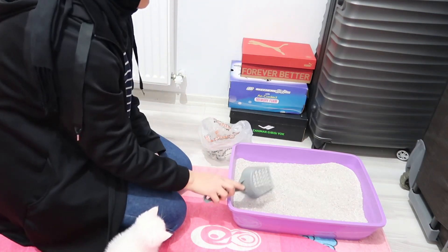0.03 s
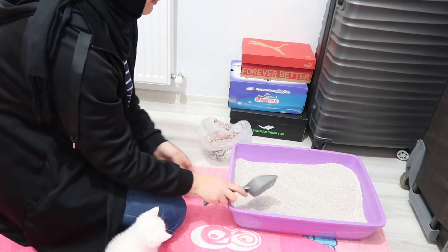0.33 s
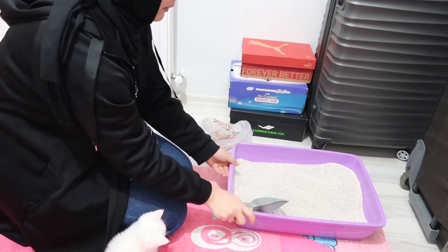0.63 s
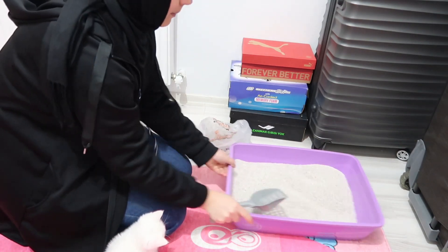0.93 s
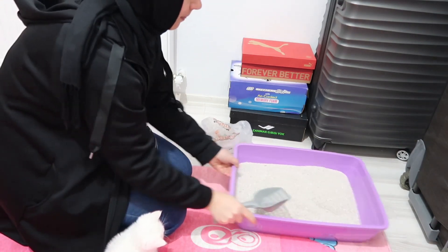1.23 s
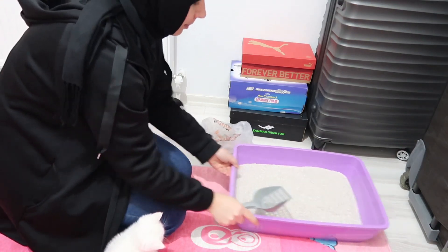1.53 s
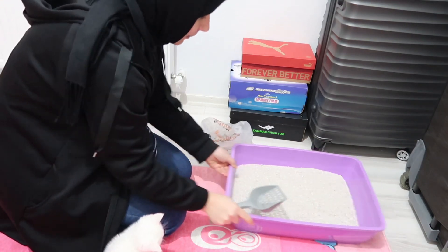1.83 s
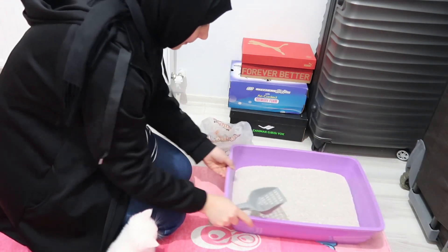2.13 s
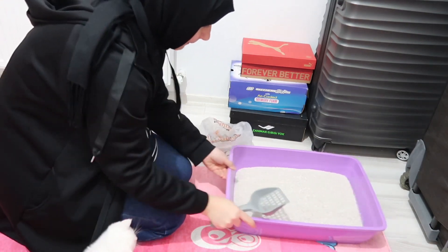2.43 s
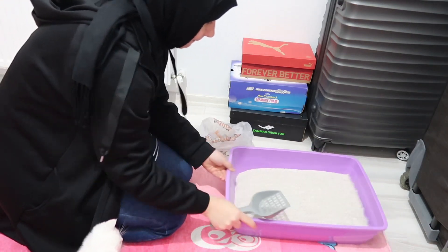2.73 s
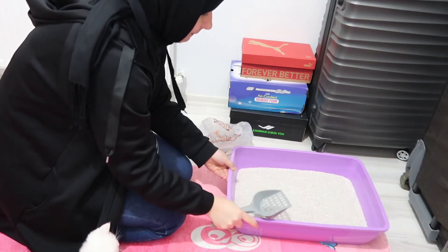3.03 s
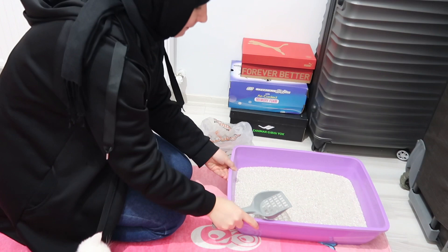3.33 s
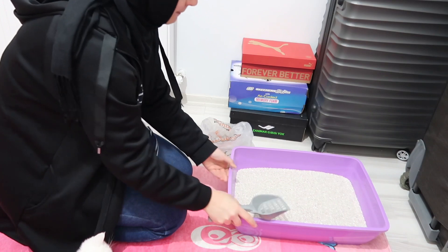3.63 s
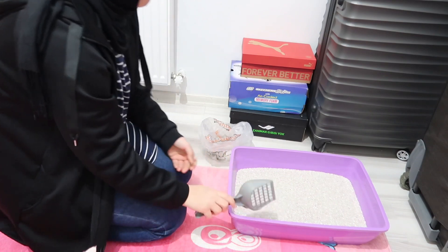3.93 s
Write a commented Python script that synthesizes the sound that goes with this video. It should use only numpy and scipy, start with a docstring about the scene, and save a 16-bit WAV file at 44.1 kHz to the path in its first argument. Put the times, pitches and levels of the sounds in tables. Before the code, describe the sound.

Cat litter hisses and crunches under a shaken scoop between knocks against a plastic tray.

```python
"""Three knocks set a plastic tray of cat litter booming, close to the microphone in a small room.
The scoop clacks down, then is pushed to and fro about six times a second, the granules hissing
and crunching in step with its speed while the tray rocks with soft thuds. After a pause and a
short rustle the scoop knocks against the tray wall. Each blow rings tray, scoop and wall, and
the harder ones jolt granules loose."""
import sys
import numpy as np
from scipy import signal
from scipy.fft import rfft, irfft
from scipy.io import wavfile
from scipy.ndimage import uniform_filter1d, minimum_filter1d

SR = 44100
rng = np.random.default_rng(int(sys.argv[2]) if len(sys.argv) > 2 else 0)


def wav_record(signal):
    """Record a signal, one row per channel, as 16-bit PCM in the file named by sys.argv[1]."""
    frames = np.transpose(np.atleast_2d(signal))
    bounded = np.clip(frames, -1, 1)
    # unit amplitude maps onto the largest positive 16-bit level
    quanta = np.round(bounded * 32767).astype(np.int16)
    wavfile.write(sys.argv[1], SR, quanta)


N = 176400
RING_T = np.arange(int(.6 * SR)) / SR  # time axis of one blow, s

# Spectrum of single granules hitting bare plastic: f/Hz, level/dB
GRIT_SPECTRUM = [(2500, -17), (5300, 3), (9000, -6), (15000, -15)]
GRIT_PER_S = 950


def scoop_strokes():
    """Each stroke speeds up and stops; the granules hiss, crunch and shake the tray in step."""
    # Strokes, then brief scrapes: t/s, length/s, level/dB, extra crunch/dB, place of top speed (0-1)
    strokes = [(0.865, 0.11, -19, -15, 0.52), (0.956, 0.18, -7.5, 0, 0.52), (1.119, 0.16, 0, -2, 0.6),
               (1.271, 0.14, 0, -1, 0.6), (1.424, 0.15, 1.5, -0.5, 0.62), (1.57, 0.15, 0.5, 0, 0.56),
               (1.731, 0.15, -0.5, 2, 0.57), (1.883, 0.15, 0.5, -0.5, 0.57), (2.054, 0.16, 0.5, -2, 0.58),
               (2.217, 0.15, 1, 0.5, 0.57), (2.377, 0.15, 0.5, 0, 0.59), (2.533, .15, 2, 3, 0.62),
               (2.689, 0.16, 2.5, 0, 0.63), (2.848, 0.14, 0.5, -1, 0.57), (2.99, 0.14, -5.5, 2.5, 0.59),
               (3.157, 0.07, -17.5, 7.5, 0.59), (3.658, 0.029, -30, 18, 0.75), (3.706, 0.035, -32, 5, 0.3),
               (3.738, 0.079, -20, 13, 0.65), (3.826, 0.062, -21, 2, 0.27)]
    # Spectrum of granules sliding on plastic: f/Hz, level/dB
    hiss = [(150, -44), (300, -17.5), (500, -9.5), (800, -4.5), (1200, -0.2), (1800, 0.5), (2400, 0),
            (3500, -6.5), (5000, -14.5), (8000, -25.5), (9700, -33.5), (11000, -45), (12500, -34.5),
            (15500, -49)]
    # Spectrum of the litter bed under the scoop: f/Hz, level/dB
    crunch = [(120, -42), (220, -0.5), (400, 4), (600, 7), (900, -7), (1600, -45)]
    # Spectrum of the tray shifting on its mat: f/Hz, level/dB
    rumble = [(35, -20), (55, -1), (100, -4.5), (200, 3.5), (300, -12.5), (600, -36)]
    bite, bite_peak_s = 0.22, 0.016  # extra speed as the scoop turns and bites into the bed
    surge_db, surge_s = 0.38, 0.007  # slight random flutter of the level
    speed, weight = np.zeros(N), np.zeros(N)
    for start, length, db, crunch_db, top in strokes:
        progress = np.arange(0, length, 1 / SR) / length
        skew = np.log(.5) / np.log(top)
        arch = abs(np.sin(np.pi * progress ** skew)) ** 0.89
        arch = arch * (1 - bite * progress) + bite * swell(bite_peak_s)[:len(progress)]
        add(speed, start, amp(db) * arch)
        add(weight, start, amp(db + crunch_db) * arch)
    surge = amp(surge_db * unit(uniform_filter1d(rng.standard_normal(N), int(surge_s * SR))))
    granules = amp(-19) * speed * grains(hiss) + amp(-33.5) * weight * grains(crunch)
    # The fastest part of a stroke flings some against the wall.
    granules += amp(-52.5) * speed ** 1.7 * grains(GRIT_SPECTRUM, GRIT_PER_S)
    return surge * granules + amp(-49.5) * np.sqrt(speed) * grains(rumble)


def grains(spectrum, per_s=30000):
    """A shower of tiny impacts whose colour shifts in patches as the granules regroup."""
    patch_db, patch_hz, patch_s = 1.5, 450, .03
    impacts = colour(rng.standard_normal(N) * (rng.random(N) < per_s / SR), spectrum)
    bands = signal.stft(impacts, nperseg=512, noverlap=384)[2]
    patches = uniform_filter1d(rng.standard_normal(bands.shape), int(patch_hz * 512 / SR), axis=0)
    patches = uniform_filter1d(patches, int(patch_s * SR / 128), axis=1)
    bands *= amp(patch_db * unit(patches))
    return unit(signal.istft(bands, nperseg=512, noverlap=384)[1][:N])


def knocks():
    """Every blow snaps and rings the same tray, scoop and wall, in shares set by where it lands."""
    # Blows and small ticks: t/s, crack/dB, crack f/Hz, tray/dB, scoop/dB, wall/dB, snap/dB
    blows = [(-.078, -16, 3300, -7, -42, -40, -40), (.0590, 1.5, 3240, 0, -13, -16, -11),
             (0.196, 4, 3360, -0.5, -15, -21, -8), (0.327, -7, 3200, -6.5, -21, -13, -22),
             (0.6746, -25, 2820, -26.5, -42, -26, -45), (0.7355, -34, 2310, -19.5, -34, -17, -45),
             (0.741, 4, 2540, -23, -5.5, -12, 1), (.745, -9, 2100, -16.5, -16.5, -7.5, -10),
             (3.690, -29, 2280, -37, -32.5, -26, -31), (3.7126, -35, 2020, -28, -45, -44, -42),
             (3.7948, -30, 1800, -24, -37, -17.5, -44), (3.8452, -24, 2460, -36, -34, -42, -29),
             (3.9345, -6.5, 2700, -6, -10, 5, -32)]
    # Modes of the tray wall: f/Hz, level/dB, t60/s
    wall_modes = [(607, -1.5, 0.041), (662, 6, 0.043), (719, -8.5, 0.1), (819.5, -11.5, 0.11),
                  (1015, -17.5, 0.11), (1382, -13, 0.2), (2310, -13.5, 0.12)]
    # Spectrum of the sharp edge of a hard contact: f/Hz, level/dB
    snap_spectrum = [(1000, -22), (4800, 9), (7000, -2), (10000, -10.5), (15000, -31)]
    spread = 1 - np.exp(-RING_T / 0.00097)  # the ringing builds in about a millisecond
    tray, scoop = tray_boom(spread), scoop_clatter()
    wall = amp(-13.5) * struck(wall_modes)
    snap = amp(-21) * swell(peak_s=0.00077) * colour(even_noise(), snap_spectrum)
    out = np.zeros(N)
    for s, crack_db, hz, tray_db, scoop_db, wall_db, snap_db in blows:
        ringing = amp(tray_db) * tray + amp(scoop_db) * scoop + amp(wall_db) * wall
        add(out, s, amp(snap_db) * snap + amp(crack_db - 5.5) * crack(hz) + spread * ringing)
    # A high-pass trims the sub-bass thump from the blows.
    return signal.sosfilt(signal.butter(2, 62, "highpass", fs=SR, output="sos"), out)


def tray_boom(spread):
    """The struck tray booms and stirs the room, then rings again softly as it settles on its mat."""
    # A low, long room resonance set off by the knocks, then the tray floor's modes: f/Hz, level/dB, t60/s
    modes = [(53.5, -19, 1.2), (128.7, -11, 0.14), (189.7, -8.5, 0.37), (230, 0.5, 0.18), (248, -8, 0.18),
             (401.7, -6.5, 0.39), (448.2, -4, 0.31), (479.7, 0.5, 0.18), (539.5, -12.5, 0.17),
             (686.5, -3, 0.17), (749, -13.5, 0.18), (820, -10.5, 0.19), (848.6, -4, 0.12),
             (890, -1.5, 0.062), (948, -17, 0.22), (1136, -29, 0.08), (1260, -13, 0.23), (1427, -18, 0.12),
             (1645, -36, 0.069), (2500, -8, 0.15), (3660, -12, 0.16)]
    # Spectrum of the tray's dense modes: f/Hz, level/dB
    dense_spectrum = [(50, -26), (110, -4.5), (200, 2.5), (330, 1.5), (500, 0.5), (850, -2.5), (1400, -6),
                      (2000, -18), (2500, -18), (3600, -15.5), (5000, -18), (7000, -31), (10000, -57),
                      (15000, -71)]
    # Their decay: f/Hz, t60/s
    dense_t60 = [(100, 0.22), (450, 0.22), (1200, 0.27), (3000, 0.31), (9000, 0.1)]
    rebound_s, rebound_db = .082, -18
    tones = amp(-13) * struck(modes)
    boom = tones + amp(-12.5) * dying(colour(even_noise(), dense_spectrum), dense_t60)
    add(boom, rebound_s, amp(rebound_db) * spread * tones)
    return boom


def scoop_clatter():
    """The struck scoop rings in a few clear modes over a wash of dense ones."""
    # Modes of the scoop: f/Hz, level/dB, t60/s
    modes = [(672, 3.5, 0.11), (970, -1, 0.17), (1370, -13, 0.2), (1881, 8, 0.056), (2045, -0.5, 0.15),
             (2527, 8, 0.062), (2740, -2, 0.12), (3400, -2, 0.13), (2605, 22, 0.014)]
    # Spectrum of its dense modes: f/Hz, level/dB
    dense_spectrum = [(50, -28), (120, -13), (350, 0.5), (700, 8), (1400, 3.5), (2700, -2), (3600, -8),
                      (5000, -17), (7000, -37), (9500, -30), (11500, -56), (15000, -48)]
    # Their decay: f/Hz, t60/s
    dense_t60 = [(100, 0.61), (700, 0.24), (2500, 0.36), (9000, 0.13)]
    wash = dying(colour(even_noise(), dense_spectrum), dense_t60)
    return amp(-18.5) * struck(modes) + amp(-13.5) * wash


def crack(hz):
    """The brief contact of hard plastic reaches the microphone with its first reflections."""
    # Contact modes: multiple of the crack pitch, level/dB
    modes = [(.5, -2.5), (.76, 1.5), (1, 1.5), (1.22, -3.5), (1.48, -5)]
    # Reflections off the floor and near walls: delay/s, gain
    echoes = [(.0013, 0.84), (.0042, 0.41), (.0061, 0.093), (0.0093, 0.084)]
    t60, rise_s, contact_hz = 0.0054, 0.00035, 5860
    direct = struck([(hz * ratio, db, t60) for ratio, db in modes]) * (1 - np.exp(-RING_T / rise_s))
    # The give of the contact dulls the treble.
    direct = signal.sosfilt(signal.butter(3, contact_hz, fs=SR, output="sos"), direct)
    out = direct.copy()
    for delay, gain in echoes:
        add(out, delay, gain * direct)
    return out


def spills():
    """Granules jump at a blow and patter back, some onto bare plastic."""
    # Granules jolted loose: t/s, level/dB, time to the peak/s, gritty rattle/dB
    jolts = [(.062, -28, 0.013, -62), (.199, -34, 0.011, -53), (.331, -49, 0.025, -66),
             (.69, -46, 0.044, -75), (0.745, -32, 0.006, -48), (3.951, -25.5, 0.0085, -50.5),
             (3.974, -48, 0.0076, -42)]
    # Spectrum of their patter: f/Hz, level/dB
    patter = [(500, -12), (1800, 8.5), (3800, 1.5), (5500, -7), (8500, -12.5), (11000, -36), (15000, -40)]
    level, rattle = np.zeros(N), np.zeros(N)
    for s, db, peak_s, rattle_db in jolts:
        add(level, s, amp(db) * swell(peak_s))
        add(rattle, s, amp(rattle_db) * swell(peak_s))
    return level * grains(patter) + rattle * grains(GRIT_SPECTRUM, GRIT_PER_S)


def bumps():
    """Dull thuds as the tray rocks."""
    # Soft bumps of the tray: t/s, level/dB, f/Hz
    thuds = [(0.745, -16.5, 129), (1.093, -23.5, 221), (1.366, -30, 215), (1.386, -26.5, 112),
             (1.677, -29, 95), (1.977, -22.5, 220), (2.799, -37, 153), (2.995, -24, 224)]
    rise = 1 - np.exp(-RING_T / 0.0065)
    out = np.zeros(N)
    for s, db, hz in thuds:
        add(out, s, amp(db) * rise * ring(hz, t60=0.083))
    return out


def room(x):
    """The short diffuse tail of a small room, starting 4 ms behind the direct sound."""
    # Reverberation time: f/Hz, t60/s
    decay = [(100, 0.68), (400, 0.75), (1500, 0.42), (5000, 0.47), (12000, 0.61)]
    tail = dying(even_noise(), decay) * np.clip((RING_T - .004) / 0.01, 0, 1)
    return signal.fftconvolve(x, tail / np.linalg.norm(tail))[:N]


def room_tone():
    """The quiet, steady air of the room, mostly low rumble."""
    # Spectrum of the air: f/Hz, level/dB
    air = [(15, -40), (25, -25), (42, -6), (60, -4), (116, -10), (198, -13.5), (274, -13.5), (410, -12),
           (597, -21.5), (2490, -27), (8570, -42.5), (15500, -51)]
    return amp(-48.5) * colour(rng.standard_normal(N), air)


def ring(hz, t60):
    """One struck mode."""
    return np.sin(2 * np.pi * hz * RING_T) * np.exp(-np.log(1000) * RING_T / t60)


def struck(modes):
    """A set of modes, neighbours swinging in opposite directions."""
    return sum((-1) ** k * amp(db) * ring(hz, t60) for k, (hz, db, t60) in enumerate(modes))


def swell(peak_s):
    """A quick rise to 1 and a slower fall."""
    return RING_T / peak_s * np.exp(1 - RING_T / peak_s)


def even_noise():
    """Flat noise one blow long, made in short blocks so that no band sticks out."""
    phases = rng.random((len(RING_T) // 1024 + 1, 513))
    blocks = irfft(np.exp(2j * np.pi * phases), axis=1)
    return unit(blocks.ravel()[:len(RING_T)])


def dying(x, t60):
    """Lets each band of x die at its own speed."""
    hz, t, bands = signal.stft(x, SR, nperseg=256)
    decay = np.exp(-np.log(1000) * t / read(t60, hz)[:, None])
    return signal.istft(bands * decay, SR, nperseg=256)[1][:len(x)]


def colour(x, spectrum):
    """Gives x a spectrum, at rms 1."""
    gain = amp(read(spectrum, np.fft.rfftfreq(len(x), 1 / SR)))
    return unit(irfft(rfft(x) * gain, len(x)))


def read(points, hz):
    """Reads a table on a log-frequency axis."""
    f, value = np.transpose(points)
    return np.interp(np.log(hz + 1), np.log(f + 1), value)


def add(mix, s, sound):
    """Mixes a sound in at time s."""
    at = round(s * SR)
    sound = sound[max(-at, 0):]
    part = mix[max(at, 0):][:len(sound)]
    part += sound[:len(part)]


def amp(db):
    """Decibels to gain."""
    return 10 ** (np.asarray(db) / 20)


def unit(x):
    """Scales to rms 1."""
    return x / np.sqrt(np.mean(x ** 2) + 1e-20)


def scene():
    """Knocks and litter close to one microphone, with the room's tail and air behind them."""
    hits = knocks() + bumps()
    sifting = scoop_strokes() + spills()
    reverb = room(amp(-17) * hits + amp(-7) * sifting)
    return (hits + sifting + reverb + room_tone())[None]


def record(dry):
    """A quick limiter holds the loudest peaks; a steep low-pass then cuts the highest treble."""
    ceiling, edge_hz = .95, 15650
    gain = np.minimum(1, ceiling / (abs(dry) + 1e-9))
    gain = minimum_filter1d(gain, size=81)
    gain = uniform_filter1d(uniform_filter1d(gain, size=41), size=41)
    lowpass = signal.firwin(1023, edge_hz, window=("kaiser", 9), fs=SR)
    return signal.oaconvolve(dry * gain, lowpass[None], "same")


dry = scene()
out = record(dry)
wav_record(out)
```